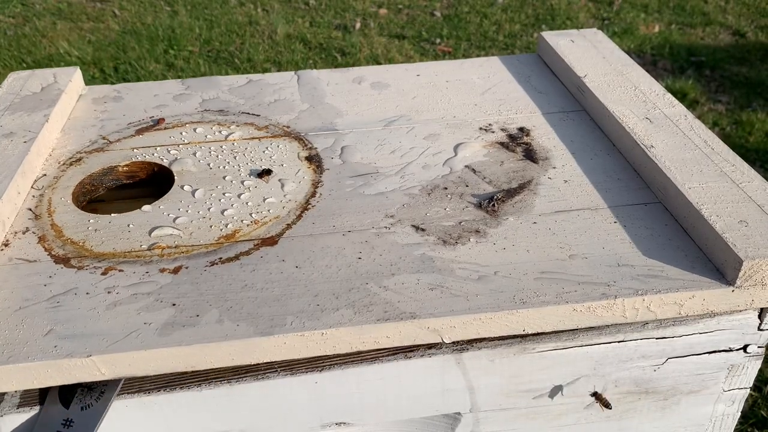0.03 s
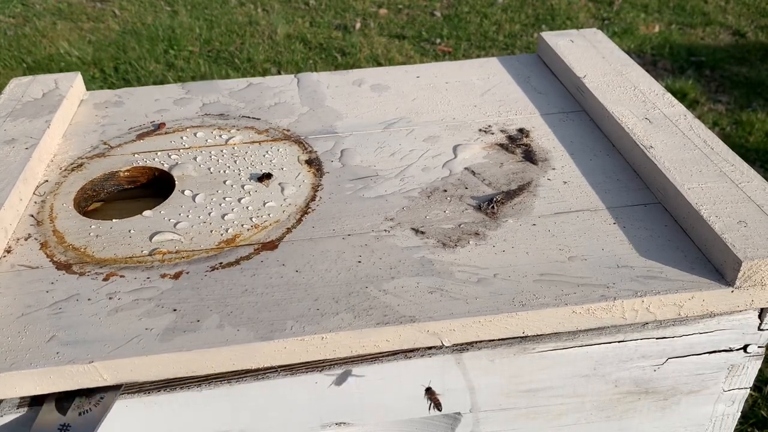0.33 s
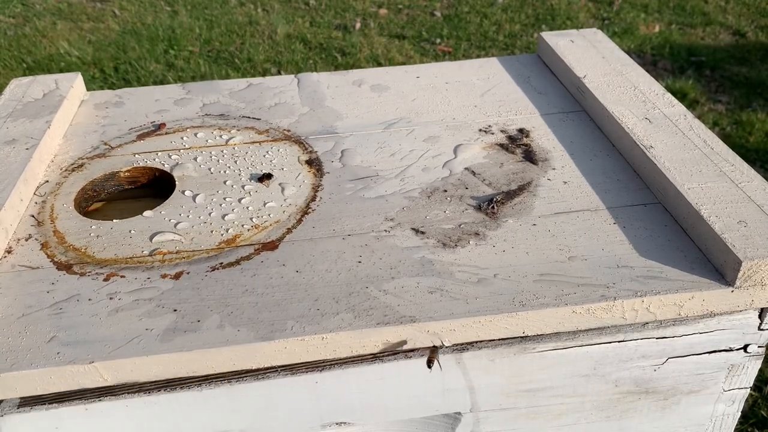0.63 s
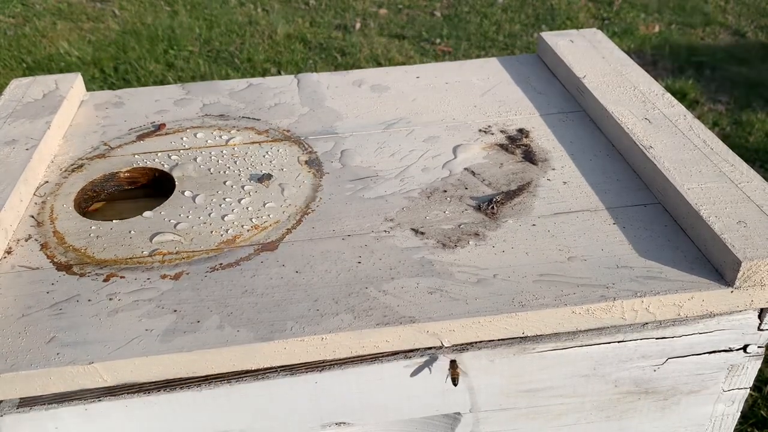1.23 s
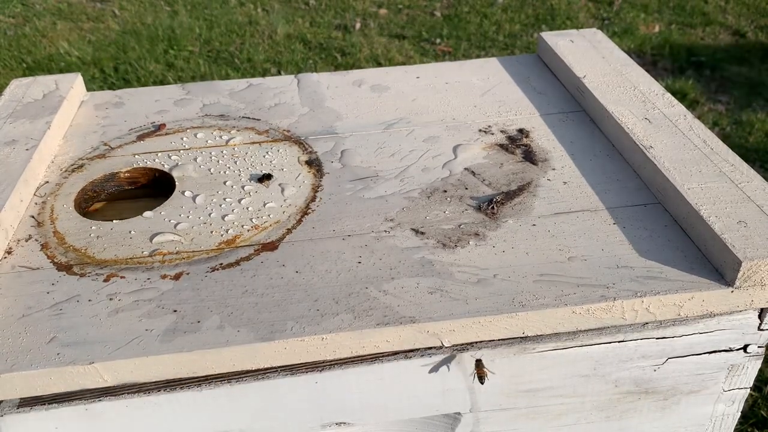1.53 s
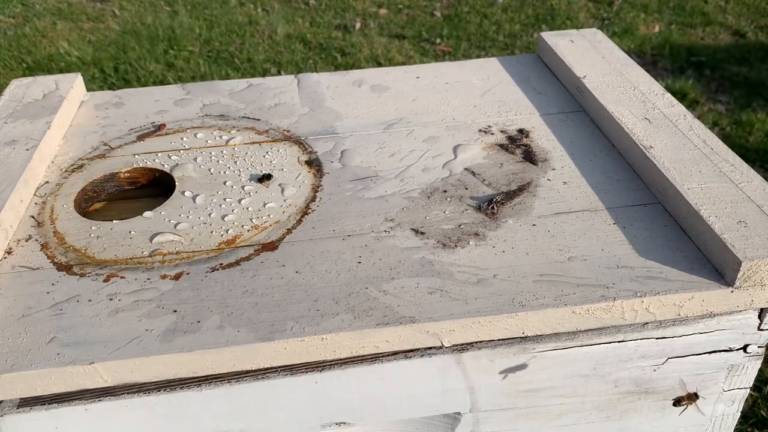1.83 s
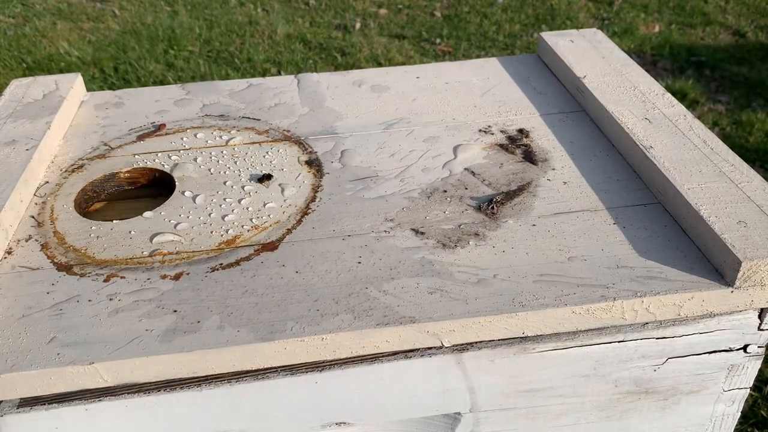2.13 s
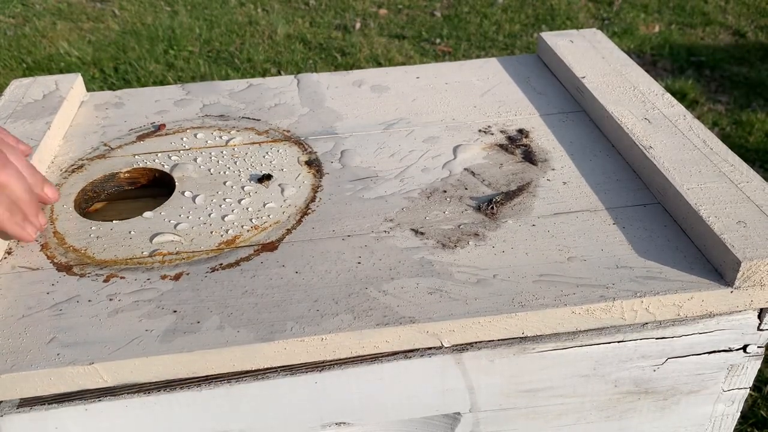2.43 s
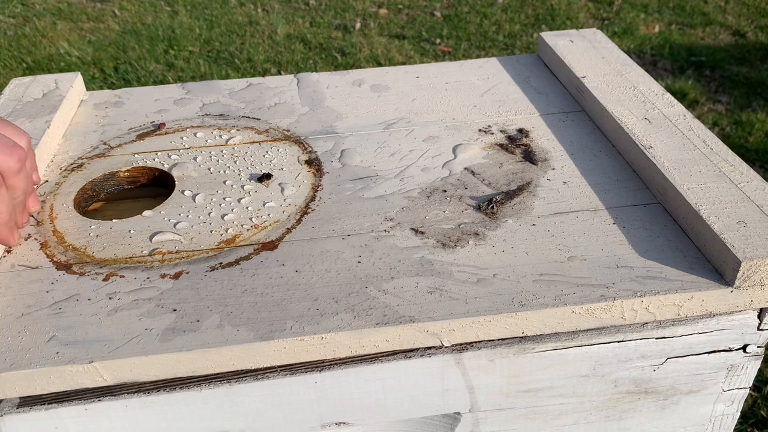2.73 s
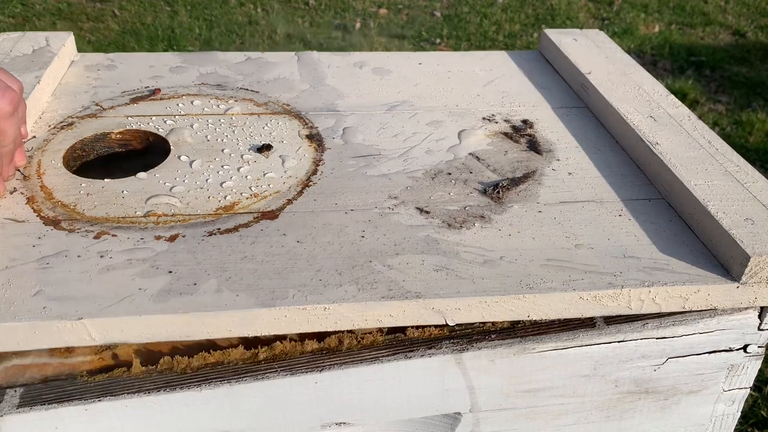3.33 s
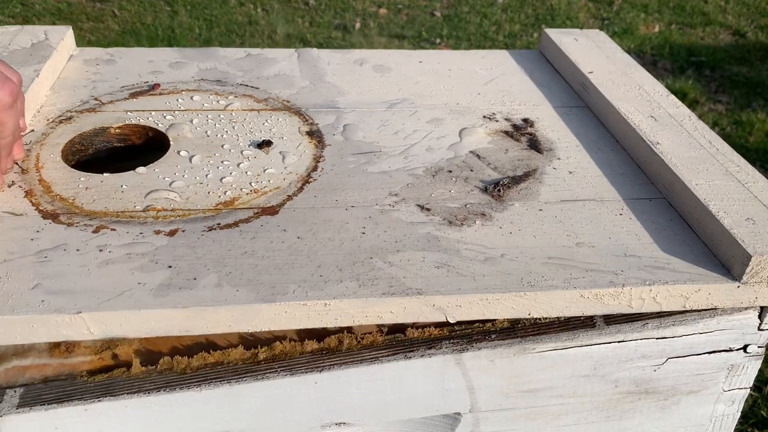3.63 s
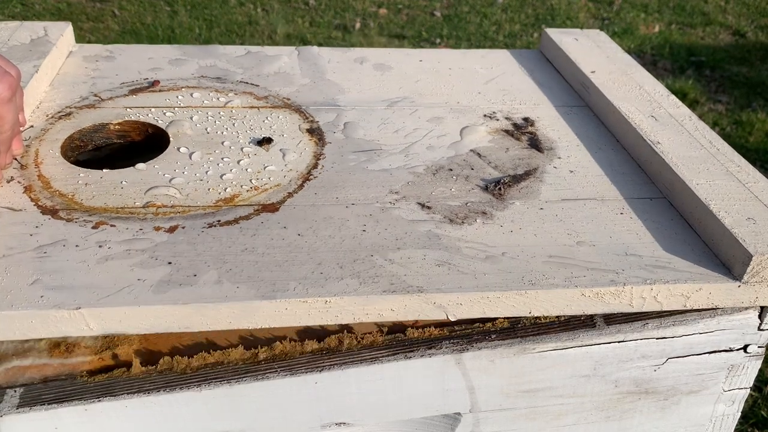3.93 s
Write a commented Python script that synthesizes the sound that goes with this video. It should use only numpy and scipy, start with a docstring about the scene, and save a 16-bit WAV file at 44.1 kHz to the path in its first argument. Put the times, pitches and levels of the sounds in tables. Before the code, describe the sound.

A bee smoker puffs in two runs, with a wooden hive cover cracking loose between.

```python
"""Outdoors beside a wooden hive, a bee smoker is pumped in two runs of four puffs.
Air rushes from the nozzle with each squeeze, and the bellows flap and suck air back in.
Between the runs the glued hive cover is pried up with a quick string of cracks that ring the wood;
the pry tool clicks against it as it lifts. Light wind, a soft rustle and the faint hum of
bees' wings lie behind it all, heard through two closely spaced microphone ports."""
import sys
import numpy as np
from scipy import signal
from scipy.fft import rfft, irfft, next_fast_len
from scipy.io import wavfile
from scipy.ndimage import map_coordinates

SR = 44100
rng = np.random.default_rng(int(sys.argv[2]) if len(sys.argv) > 2 else 0)


def store_pcm(level_fs):
    """Save levels as 16-bit WAV."""
    pcm = np.round(np.clip(level_fs, -1, 1) * 32767).astype(np.int16)
    wavfile.write(sys.argv[1], SR, np.atleast_2d(pcm).T)


N = 176400
T = np.arange(N) / SR
HIT_T = np.arange(SR // 4) / SR  # seconds within one short hit

# tone of a bright snap: pitch_hz, level_db
SNAP_SPECTRUM = [(200, -17), (1500, -4), (4500, -1.5), (6800, 0), (8300, 3.5), (9800, 5.5), (11000, -2.5),
                 (13000, 7), (15000, 3), (16500, -13)]
# tone of splintering wood: pitch_hz, level_db
SPLINTER_SPECTRUM = [(100, -8), (500, -1.5), (800, -7.5), (1050, 4), (1300, 5), (2300, -3), (5200, -9),
                     (7000, -2), (16000, -37)]


def amp(db):
    """Turn decibels into a gain."""
    return 10 ** (np.asarray(db) / 20)


def unit(x):
    """Scale a sound to an average (rms) level of 1."""
    return x / np.sqrt(np.mean(x ** 2) + 1e-20)


def along(points, hz):
    """Read between (pitch_hz, value) points on a logarithmic pitch scale."""
    pitches, values = np.transpose(points)
    return np.interp(np.log(hz + 1), np.log(pitches + 1), values)


def wobble(rate):
    """A smooth curve through `rate` random values a second."""
    return map_coordinates(rng.standard_normal(int(N * rate / SR) + 4), [T * rate])


def filtered(x, response):
    """Change the strength and phase of each frequency by response(hz)."""
    size = next_fast_len(N + SR // 4)
    return irfft(rfft(x, size) * response(np.fft.rfftfreq(size, 1 / SR)), size)[..., :N]


def noise(spectrum):
    """Noise with the given tone, at level 1."""
    return unit(filtered(rng.standard_normal(N), lambda hz: amp(along(spectrum, hz))))


def resonant(peaks):
    """Noise gathered in steep-sided resonances, at level 1."""
    def response(hz):
        return sum(amp(db) / (1 + ((pitch ** 2 - hz ** 2) / (hz * width + 1)) ** 2)
                   for pitch, width, db in peaks)
    return unit(filtered(rng.standard_normal(N), response))


def add(track, start_s, sound):
    """Mix a short sound into a track."""
    part = track[round(start_s * SR):][:len(sound)]
    part += sound[:len(part)]


def decay(attack_s, fade_s):
    """Loudness of a hit: a quick rise to 1, then a fall of 60 dB every fade_s."""
    shape = (1 - np.exp(-HIT_T / attack_s)) * amp(-60 * HIT_T / fade_s)
    return shape / shape.max()


def ring(modes, attack_cycles, blur_hz):
    """The fading tones (modes) of a struck object, each drifting so that it is blur_hz wide."""
    pitches, levels, fades = np.transpose(modes)
    steps = rng.standard_normal((len(modes), len(HIT_T)))
    drift = np.cumsum(steps, axis=1) * np.sqrt(2 * np.pi * blur_hz / SR)
    phases = 2 * np.pi * (pitches[:, None] * HIT_T + rng.random((len(modes), 1))) + drift
    return sum(amp(db) * np.sin(phase) * decay(attack_cycles / hz, fade_s)
               for hz, db, phase, fade_s in zip(pitches, levels, phases, fades)) / np.sqrt(len(modes))


def stroke(start, end, fullest, power):
    """Air flow in one stroke of the bellows; a higher power gives a sharper peak."""
    peak_s = start + np.clip(fullest, .1, .9) * (end - start)
    progress = np.interp(T, [start, peak_s, end], [0, .5, 1])
    return np.abs(np.sin(np.pi * progress)) ** power


def ports(x, phase, balance, echo_db, fade_s, shift_hz=1.294):
    """A source reaches both microphone ports, with brief echoes that shift as things move."""
    # tone of the echoes off the hive and the ground: pitch_hz, level_db
    echo_spectrum = [(60, -55), (300, -11), (1000, -5.5), (2500, -0.5), (4500, 4.5), (7000, -27),
                     (16000, -74)]
    side = np.array([[.5], [-.5]])  # left, right
    direct = filtered(x, lambda hz: np.exp(1j * side * np.interp(hz, *np.transpose(phase))))
    tails = (rng.standard_normal((2, 2, len(HIT_T))) * decay(.002, fade_s))[..., :SR // 16]
    tails /= np.linalg.norm(tails, axis=-1, keepdims=True)
    echo_a, echo_b = signal.oaconvolve(x[None, None], tails, axes=-1)[..., :N]
    turn = 2 * np.pi * shift_hz * T
    echoes = echo_a * np.cos(turn) + echo_b * np.sin(turn)
    both = direct + filtered(echoes, lambda hz: amp(echo_db + along(echo_spectrum, hz)))
    return filtered(both, lambda hz: amp(side * along(balance, hz)))


def wind(air_db=-55):
    """Distant air, alike at both ports only in the bass, and a gusty rumble."""
    # tone of the distant air: pitch_hz, level_db
    air_spectrum = [(25, -30), (100, -5.5), (240, -1), (320, -5), (470, 0), (560, -11), (800, -9),
                    (1500, -10), (3000, -20), (6500, -29), (9000, -77), (16000, -46)]
    # tone of the wind's rumble: pitch_hz, level_db
    rumble_spectrum = [(15, -16), (30, -14.5), (60, 4), (85, -2), (130, -9.5), (300, -22.5), (1000, -86)]
    # rise and fall of the rumble: time_s, level_db
    gusts = [(0.0, -50), (0.43, -49), (0.56, -37), (0.6, -53), (1.94, -48.5), (2.02, -58.5), (2.32, -49.5),
             (2.37, -59), (2.46, -47.5), (2.78, -55.5), (2.9, -48.5), (3.24, -52.5), (3.41, -46),
             (3.44, -49.5), (3.59, -47.5), (3.72, -51.5), (3.88, -46), (4.0, -49)]
    likeness = [(150, 1.0), (400, 0.51), (950, 0.00031), (8000, 0.17)]  # pitch_hz, left-right match

    def split(hz):
        angle = np.arccos(np.clip(along(likeness, hz), -1, 1)) / 2
        return np.array([np.cos(angle), np.sin(angle)])
    mid, side = filtered(np.array([noise(air_spectrum), noise(air_spectrum)]), split)
    rumble = noise(rumble_spectrum) + amp(-10) * np.array([noise(rumble_spectrum) for _ in range(2)])
    gust_gain = amp(np.interp(T, *np.transpose(gusts)) - 1)
    return amp(air_db) * np.array([mid + side, mid - side]) + gust_gain * rumble


def bees(count=9, wingbeat_hz=232.4, level_db=-60):
    """Beating wings make a faint buzz, each bee wandering in pitch and loudness."""
    hum = np.zeros(N)
    for _ in range(count):
        pitch_hz = wingbeat_hz * (1 + .07 * wobble(4) + .025 * wobble(35))
        phase = 2 * np.pi * np.cumsum(pitch_hz) / SR
        buzz = amp(-3) * np.sin(phase) + np.sin(2 * phase) + amp(-15) * np.sin(3 * phase)
        hum += amp(5.5 * wobble(7)) * buzz
    return amp(level_db) * unit(hum)


def rustle():
    """A faint, grainy hiss comes and goes around the work."""
    # tone of the rustle: pitch_hz, level_db
    spectrum = [(500, -31), (2500, -6), (4500, -3.5), (6200, 1.5), (7800, -2.5), (10500, -5), (12800, -3.5),
                (16000, 0.5)]
    # rise and fall of the rustle: time_s, level_db
    levels = [(0, -63), (.28, -62.5), (.39, -72), (.42, -63.5), (.5, -74.5), (.86, -67.5), (1.05, -55),
              (1.8, -63), (1.92, -65), (2.03, -59.5), (2.17, -72.5), (2.4, -64.5), (2.5, -69), (2.8, -63),
              (2.93, -53), (3.2, -57), (4, -59.5)]
    flicker_db = 2.35 * wobble(25.74) + 2.1 * wobble(300)
    return amp(np.interp(T, *np.transpose(levels)) + flicker_db) * noise(spectrum)


def pry_tool(ping_s=2.687, ping_db=-43.5, ping_hz=4356):
    """The steel tool pings as it is set in place, then clicks and rings against the lifting cover."""
    # the tool meets the cover: start_s, level_db
    clicks = [(3.3028, -24.5), (3.543, -42), (3.584, -47)]
    # ringing tones of the steel: pitch_hz, level_db, fade_s
    steel_modes = [(1000, -9, 0.067), (1380, 7, .04), (1747, 6, 0.045), (2170, 6, 0.028),
                   (2424, 4.5, 0.061), (2720, -3, 0.02), (4000, -12, 0.072), (6940, -14, 0.042)]
    contact, steel = np.zeros((2, N))
    for start, db in clicks:
        add(contact, start, amp(db - 1) * decay(0.00016, 0.02))
        add(steel, start, amp(db + 2.5) * ring(steel_modes, attack_cycles=0.62, blur_hz=4.1))
    add(steel, ping_s, ring([(ping_hz, ping_db, 0.029)], attack_cycles=1, blur_hz=23))
    return contact * (noise(SPLINTER_SPECTRUM) + amp(-10) * noise(SNAP_SPECTRUM)) + steel


def hive_cover():
    """Each break of the seal snaps, splinters and rings the board; where it breaks sets the tone."""
    # the seal gives way: start_s, snap_db, knock_db, bright_db, thud_db
    cracks = [(2.687, -41, -56, -54, -70), (2.8196, -35, -25, -42, -42), (2.8238, -24, -34, -36, -34),
              (2.8287, -27, -39, -42, -52), (2.833, -40, -35.5, -43, -52), (2.8397, -36, -38, -38, -54),
              (2.849, -10.5, -32, -27, -40), (2.8606, -27, -25.5, -42, -35),
              (2.8649, -10.5, -22, -22.5, -30.5), (2.8703, -25, -17.5, -18.5, -28),
              (2.8914, -40, -31, -21, -47), (2.893, -21, -28, -20, -36), (2.9025, -28, -34, -35, -56),
              (2.9039, -13, -18.5, -11, -22)]
    # ringing tones of the board: pitch_hz, level_db, fade_s
    board_modes = [(117.3, -3, 0.14), (157.7, -.5, 0.19), (198, 2, 0.11), (291, 2, 0.14),
                   (417, -5.5, 0.042), (515, -1, 0.091), (1072, 3, 0.031), (1543, -3, 0.028),
                   (2160, 0, .02), (2430, 2.5, 0.019), (2810, 0.5, .018), (3550, 1.5, 0.035),
                   (3780, -9, 0.013), (4360, 1.5, 0.016), (4600, -6, .015), (4980, -5, 0.022),
                   (5120, 0, 0.035), (5530, -4, .016), (5750, -5, 0.022), (7000, -6, 0.018)]
    snaps, splinters, wood = np.zeros((3, N))
    for start, snap_db, knock_db, bright_db, thud_db in cracks:
        add(snaps, start, amp(snap_db) * (decay(0.00036, 0.007) + amp(-22.5) * decay(0.0016, 0.018)))
        add(splinters, start, amp(knock_db - 4.5) * decay(0.00061, 0.018))
        push = [(350, thud_db), (700, knock_db), (2200, knock_db), (3400, bright_db)]
        modes = [(hz, db + along(push, hz), fade_s) for hz, db, fade_s in board_modes]
        add(wood, start, amp(2.5) * ring(modes, attack_cycles=1.4, blur_hz=19.6))
    crackle = unit(amp(2 * wobble(2500)) * noise(SNAP_SPECTRUM))
    return snaps * crackle + splinters * noise(SPLINTER_SPECTRUM) + wood


def bellows(thump_hz=213, thump_width_s=0.0039, thump_lag_s=0.00773):
    """Air is drawn in through a valve; at each turn the bellows tap and their wall thumps softly."""
    # the bellows refill: start_s, end_s, level_db
    refills = [(1.057, 1.168, -43), (1.305, 1.397, -44.5), (1.531, 1.672, -48), (1.734, 1.922, -49.5),
               (3.183, 3.356, -47), (3.473, 3.627, -48.5), (3.703, 3.853, -50.5)]
    # tone of air in the valve: pitch_hz, level_db
    valve_spectrum = [(40, -2), (200, 4), (700, -3.5), (1000, 6), (2000, -2), (3000, -7.5), (4200, -15.5),
                      (8000, -10.5), (16000, -23.5)]
    # the bellows flap as the stroke turns: start_s, tap_db, thump_db
    flaps = [(1.056, -33, -32), (1.166, -36.5, -35), (1.306, -36.5, -31.5), (1.402, -36.5, -39),
             (1.536, -31.5, -31), (1.64, -35, -37.5), (1.686, -31.5, -46), (1.711, -28.5, -37.5),
             (1.7752, -41, -33.5), (1.871, -56, -37), (3.017, -34, -59), (3.145, -47, -42),
             (3.5427, -37, -46), (3.8416, -33, -45), (3.923, -25.5, -34.5)]
    # resonances of a tap: pitch_hz, width_hz, level_db
    tap_peaks = [(445, 110, 0.5), (1080, 300, 10.5), (1470, 200, -3.5), (2970, 3300, -21.5)]
    intake = sum(amp(db) * stroke(start, end, fullest=0.45, power=1.44) for start, end, db in refills)
    taps, thumps = np.zeros((2, N))
    t = HIT_T - thump_lag_s
    thump_shape = np.exp(-(t / thump_width_s) ** 2)
    for start, tap_db, thump_db in flaps:
        add(taps, start, amp(tap_db) * decay(0.0006, 0.032))
        pitch_hz = thump_hz * (1 + .05 * rng.standard_normal())
        add(thumps, start, amp(thump_db - 0.5) * thump_shape * np.cos(2 * np.pi * pitch_hz * t))
    return intake * noise(valve_spectrum) + taps * resonant(tap_peaks) + thumps


def puffs(flutter_db=.7):
    """A swirling, hollow jet of air; the nozzle's resonances and hiss swell faster than the jet."""
    # squeezes of the bellows: start_s, end_s, fullest_share (of the length), level_db,
    # then, added to that level: hollow_db, nozzle_db, upper_db, hiss_db
    squeezes = [(.893, 1.055, 0.49, -36.5, -15, 2, -5, -4.5), (1.158, 1.303, 0.49, -36, -3, 0, -22, -6.5),
                (1.398, 1.533, 0.44, -39.5, -1, -4.5, -31, -7),
                (1.628, 1.76, 0.53, -40, -5, -2.5, -14, -7.5),
                (2.955, 3.195, 0.52, -39.5, -6, -16.5, -19.5, -6.5),
                (3.3, 3.472, 0.54, -37.5, -4, -14, -19.5, -4),
                (3.57, 3.728, 0.46, -39.5, -2.5, -11, -21, -6),
                (3.828, 3.965, 0.59, -39.5, -0.5, -17, -25, -3.5)]
    # tone of the jet: pitch_hz, level_db
    jet_spectrum = [(30, -32), (90, -0.5), (170, 6.5), (340, -0.5), (470, 0), (720, -6), (1000, -6),
                    (1450, 3.5), (2200, -7), (2800, -29.5), (3600, -16), (8000, -64), (16000, -45)]
    # resonances of the hollow body: pitch_hz, width_hz, level_db
    hollow_peaks = [(980, 290, 6), (1320, 350, -22), (1880, 140, -14)]
    # main resonances of the nozzle: pitch_hz, width_hz, level_db
    nozzle_peaks = [(2804, 770, 3), (3100, 290, -1)]
    # its upper resonances, heard in hard puffs: pitch_hz, width_hz, level_db
    upper_peaks = [(4400, 800, 3), (4890, 690, 3), (5920, 790, -8.5), (6800, 430, 0)]
    # tone of the hiss: pitch_hz, level_db
    hiss_spectrum = [(300, -23), (2500, 8.5), (4500, -3.5), (6100, 1), (7900, 3), (10500, -1.5), (12800, 1),
                     (16000, -8)]
    jet, hollow, nozzle, upper, hiss = np.zeros((5, N))
    for start, end, fullest, db, hollow_db, nozzle_db, upper_db, hiss_db in squeezes:
        flow = stroke(start, end, fullest, power=1.93)
        jet += amp(db) * flow ** 0.61
        hollow += amp(db + hollow_db) * flow ** 0.59
        nozzle += amp(db + nozzle_db) * flow ** 1.11
        upper += amp(db + upper_db) * flow ** 1.37
        hiss += amp(db + hiss_db) * flow ** 1.01
    flutter = amp(flutter_db * wobble(110))
    body = jet * noise(jet_spectrum) + hollow * resonant(hollow_peaks)
    whistle = nozzle * resonant(nozzle_peaks) + upper * resonant(upper_peaks)
    return flutter * (body + whistle + hiss * noise(hiss_spectrum))


def scene(move_s=2.4):
    """Place the sounds between left and right; the smoker changes place between its runs."""
    # how far the left port leads for the first run: pitch_hz, phase_radians
    first_phase = [(0, 0), (1350, 3.1), (2800, 6.7), (3600, 9.4), (4500, 11.6), (5500, 14.3), (6300, 12.5),
                   (8400, 9.4), (11000, 6.3), (13600, 3.1), (16500, -.6)]
    # the same for the second run, the rustle and the tool: pitch_hz, phase_radians
    later_phase = [(0, 0), (1250, 3), (2400, 5.2), (3800, 8.3), (5400, 2.6), (6200, 0), (8500, -3.1),
                   (11000, -6.2), (13700, -9.4), (16500, -13)]
    # the same for the cover: pitch_hz, phase_radians
    cover_phase = [(0, 0), (400, .3), (1400, 3.1), (2500, 2.2), (3500, 2.6), (5200, 3), (5800, .8),
                   (6200, .2), (8500, -3.1), (11000, -6.2), (13700, -9.4), (16500, -13)]
    # how much louder smoker, rustle and tool are on the left: pitch_hz, left_minus_right_db
    balance = [(100, 0.5), (450, 0.5), (740, 4), (1400, 1.5), (2300, -0.5), (3600, 1), (5400, -7.5),
               (7500, 2.5), (16000, -0.5)]
    # the same for the cover: pitch_hz, left_minus_right_db
    cover_balance = [(100, 3), (500, -1.5), (1100, 4.5), (1700, 11.5), (2600, 4), (3600, -4), (5400, -8.5),
                     (7500, 3), (16000, -2)]
    smoker = puffs() + bellows()
    first = ports(smoker * (T < move_s), first_phase, balance, echo_db=-4.5, fade_s=0.028)
    later = ports(smoker * (T >= move_s) + rustle(), later_phase, balance, echo_db=-2.5, fade_s=0.025)
    clicks = ports(pry_tool(), later_phase, balance, echo_db=-8, fade_s=0.02)
    cracks = ports(hive_cover(), cover_phase, cover_balance, echo_db=-7.5, fade_s=0.026)
    return first + later + clicks + cracks + bees() + wind()


def record(dry):
    """Cut away the very highest treble."""
    top_hz = 16300
    return filtered(dry, lambda hz: 1 / (1 + (hz / top_hz) ** 120))


dry = scene()
out = record(dry)
store_pcm(out)
```